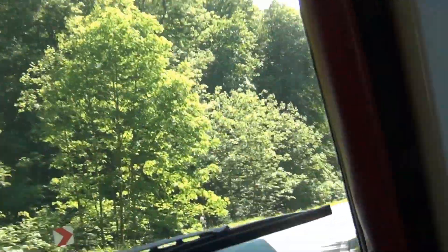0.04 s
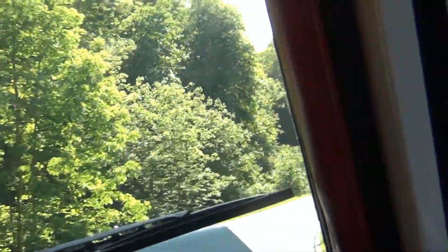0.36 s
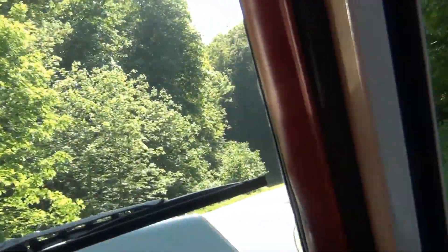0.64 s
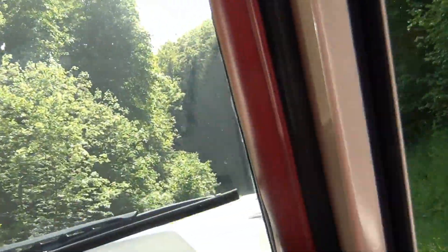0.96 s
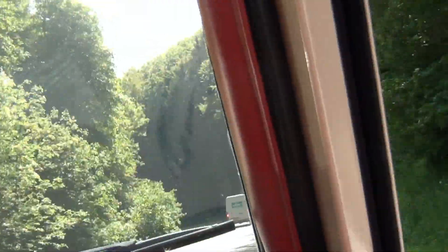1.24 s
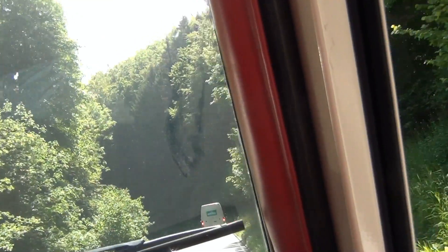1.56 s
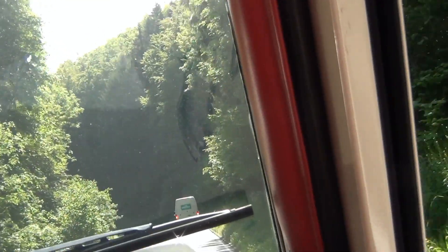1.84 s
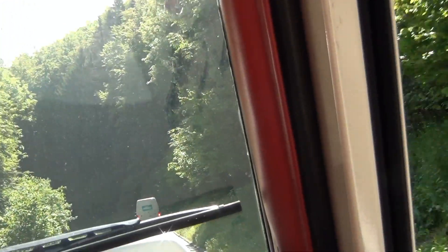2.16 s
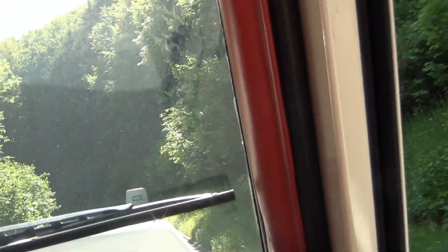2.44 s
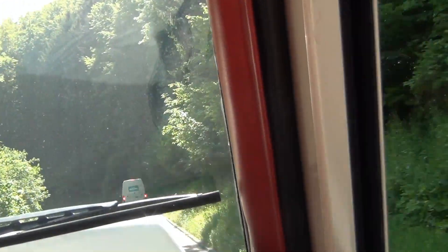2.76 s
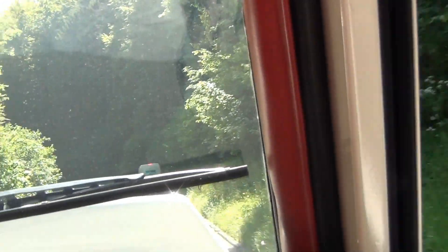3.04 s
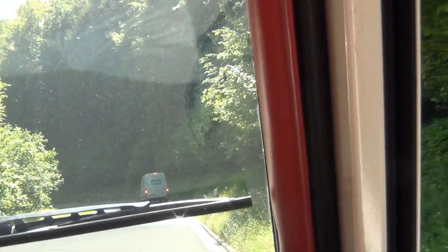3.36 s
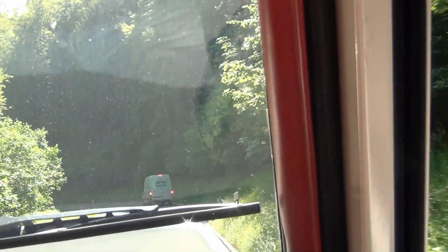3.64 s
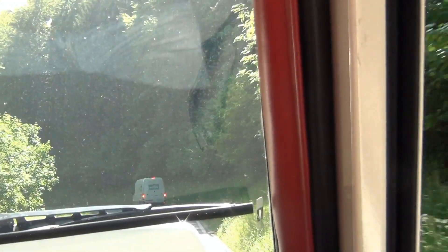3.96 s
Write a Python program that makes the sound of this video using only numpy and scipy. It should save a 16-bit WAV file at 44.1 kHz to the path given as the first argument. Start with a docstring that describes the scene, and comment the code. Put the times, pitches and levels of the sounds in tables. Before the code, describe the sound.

An old van drives along a country road, heard from the front seat. A bump rattles the body, then the engine booms under load over tyre roar and wind hiss, before easing off as loose fittings tick.

```python
"""Inside an old van on a country road: tyres rumble and roar, wind hisses, the driveline hums.
At the start a bump jolts and rattles the body. After a second the engine takes up load with a brief
judder, then booms in the cab as it slowly gains speed, its exhaust overtones sliding through cab
resonances. Near three seconds it eases off and two smaller bumps follow.
Loose fittings tick now and then."""
import sys
import numpy as np
from scipy import signal
from scipy.fft import rfft, irfft
from scipy.io import wavfile
from scipy.ndimage import uniform_filter1d

SR = 44100
rng = np.random.default_rng(int(sys.argv[2]) if len(sys.argv) > 2 else 0)


def transcribe(signal):
    """Save signal, clipped to [-1, 1], as a 16-bit WAV file at the path in sys.argv[1]."""
    frames = np.atleast_2d(signal).T
    limited = np.clip(frames, -1, 1)
    pcm = np.round(limited * 32767).astype(np.int16)
    wavfile.write(sys.argv[1], SR, pcm)


N = 176400
TIME_S = np.arange(N) / SR


def amp(db):
    """Decibels to gain."""
    return 10 ** (np.asarray(db) / 20)


def curve(table, column=1):
    """One table column, interpolated linearly in time."""
    rows = np.array(table, float)
    return np.interp(TIME_S, rows[:, 0], rows[:, column])


def shaped(x, gain):
    """Filters x by gain(Hz); rms 1."""
    y = irfft(rfft(x) * gain(np.fft.rfftfreq(N, 1 / SR) + 1e-3), N)
    return y / np.sqrt(np.mean(y ** 2) + 1e-20)


def coloured(x, spectrum):
    """Filters x through (Hz, dB) points; rms 1."""
    hz, db = np.transpose(spectrum)
    return shaped(x, lambda f: amp(np.interp(np.log(f), np.log(hz), db, right=-100)))


def white():
    """White noise."""
    return rng.standard_normal(N)


def drift(rate_hz):
    """Slow random motion; rms 1."""
    return shaped(white(), lambda f: 1 / (1 + (f / rate_hz) ** 4))


def tone(phase, waver, waver_hz):
    """Sinusoid wavering in level and phase; rms near 1."""
    phase = phase + rng.uniform(0, 2 * np.pi)
    in_phase = (1 + waver * drift(waver_hz)) * np.cos(phase)
    quadrature = waver * drift(waver_hz) * np.sin(phase)
    return np.sqrt(2) * (in_phase + quadrature)


def resonance(hz, centre_hz, width_hz):
    """Gain of one resonance, 1 at its centre."""
    return 1 / np.sqrt(1 + (2 * (hz - centre_hz) / width_hz) ** 2)


def burst(start_s, rise_s, decay_s):
    """Envelope: linear rise, exponential fall."""
    t = TIME_S - start_s
    return np.clip(t / rise_s, 0, 1) * np.exp(-np.maximum(t - rise_s, 0) / decay_s)


# Each row: time in seconds, relative road roar level in dB, relative wind hiss level in dB.
ROAR_WIND_DB = [(0, -27, -40.5), (.2, -28, -38), (.42, -26, -39), (.57, -28, -38), (.7, -26.5, -39.5),
                (.8, -28.5, -40.5), (.92, -26, -37), (1.05, -27.5, -40), (1.2, -29.5, -39.5),
                (1.45, -27, -38.5), (1.65, -29.5, -41), (2.0, -32.5, -42), (2.35, -32, -41),
                (2.5, -32, -41.5), (2.97, -30.5, -41), (3.22, -28, -40), (3.32, -26, -40.5),
                (3.5, -27.5, -40), (3.72, -29, -38), (3.92, -27, -37), (4, -28, -39)]
# Each row: frequency in Hz, relative spectral density in dB.
ROAR_SPECTRUM = [(200, -33.5), (500, 5), (800, 2.5), (1100, 1), (1400, -3), (1950, -3.5), (2500, -11.5),
                 (3500, -17), (7000, -37.5)]
WIND_SPECTRUM = [(1000, -19), (2500, 3), (3500, 0), (5000, -1.5), (6500, -6), (8800, -11), (10500, -18),
                 (13000, -24.5), (16000, -28.5)]

def roar_and_wind(firing_phase):
    """Road roar throbs with the engine, wind hisses at the window; both flutter together."""
    throb = 1 + 0.055 * np.cos(firing_phase / 2) + 0.13 * np.cos(firing_phase)
    flutter = drift(rate_hz=12)
    roar_db = curve(ROAR_WIND_DB, column=1) + 2.5 + 0.79 * flutter
    wind_db = curve(ROAR_WIND_DB, column=2) + 1 + 0.77 * flutter
    roar = coloured(white(), ROAR_SPECTRUM) * throb * amp(roar_db)
    wind = coloured(white(), WIND_SPECTRUM) * amp(wind_db)
    return roar + wind


def trim_rattle(taps_per_s=45, decay_s=0.0045):
    """Faint random chatter of the trim, following the wind hiss in colour and level."""
    hits = rng.random(N) < taps_per_s / SR
    strength_db = 8.3 * np.minimum(rng.exponential(1, N), 3)
    envelope = signal.lfilter([1], [1, -np.exp(-1 / (decay_s * SR))], hits * amp(strength_db))
    chatter = coloured(envelope * white(), WIND_SPECTRUM)
    return chatter * amp(curve(ROAR_WIND_DB, column=2) - 15)


# Each row: start in seconds, level in dB, ring frequency in Hz.
FITTING_TICKS = [(1.232, -35, 7000), (1.516, -29, 3380), (2.782, -47, 10000), (2.817, -40.5, 9450),
                 (3.157, -33, 4600), (3.245, -36, 4200), (3.846, -30.5, 4500)]

def fitting_tick(start_s, level_db, ring_hz):
    """A loose fitting taps and rings briefly."""
    ring = shaped(white(), lambda f: resonance(f, ring_hz, width_hz=0.192 * ring_hz) ** 2)
    return amp(level_db) * burst(start_s, rise_s=0.0014, decay_s=0.0045) * ring


# Each row: time in seconds, relative level in dB.
RUMBLE_LEVEL_DB = [(0, -21.5), (.15, -22.5), (.42, -16), (.9, -21.5), (1.3, -28), (1.5, -20), (1.95, -32),
                   (2.15, -25), (2.7, -27), (2.87, -21.5), (3.15, -21.5), (3.65, -18), (4, -18)]
BODY_LEVEL_DB = [(0, -17), (.4, -15), (.75, -14.5), (1.0, -14.5), (1.15, -17), (1.35, -14.5), (1.7, -21),
                 (2.2, -21.5), (2.6, -23), (2.8, -19.5), (3.1, -18), (3.25, -19), (3.4, -17.5), (3.52, -16),
                 (3.7, -19), (4, -16.5)]
# Each row: frequency in Hz, relative spectral density in dB.
RUMBLE_SPECTRUM = [(10, -26), (24, -9), (40, -0.5), (65, -0.5), (100, -2.5), (140, 2.5), (200, -8),
                   (400, -42.5)]
BODY_SPECTRUM = [(90, -35), (160, -1.5), (200, -5), (230, 4), (270, -1), (320, -1), (390, -5.5), (460, -7),
                 (540, -10.5), (700, -19), (1100, -32), (3000, -66.5)]

def body_rumble():
    """The wheels shake the floor; the body drones and one panel hums."""
    body_db = curve(BODY_LEVEL_DB)
    rumble = coloured(white(), RUMBLE_SPECTRUM) * amp(curve(RUMBLE_LEVEL_DB) + 0.5)
    drone = coloured(white(), BODY_SPECTRUM) * amp(body_db - 2)
    panel = shaped(white(), lambda f: resonance(f, centre_hz=447.8, width_hz=29) ** 2)
    return rumble + drone + panel * amp(body_db - 12)


# Each row: start in seconds, level in dB, rise and decay in seconds, low and high corner in Hz.
BUMP_JOLTS = [(.023, -6, 0.0099, .012, 185.2, 452), (.026, -16, 0.019, 0.016, 600, 1400),
              (.027, -28.5, .008, 0.025, 2500, 9000), (0.041, -8, 0.025, 0.019, 40, 110),
              (0.061, -11, 0.016, 0.0047, 940, 1570), (0.059, -20.5, 0.013, 0.02, 2200, 7600),
              (.07, -26, 0.011, 0.057, 2980, 9900), (3.19, -27, 0.05, 0.015, 720, 950),
              (3.484, -17.5, 0.018, 0.023, 280.5, 397)]

def bump_jolt(start_s, level_db, rise_s, decay_s, low_hz, high_hz):
    """A bump makes body panels thud or clatter: a burst of band-passed noise."""
    def band(f):
        return 1 / np.sqrt((1 + (low_hz / f) ** 4) * (1 + (f / high_hz) ** 4.6) * (1 + (f / 10000) ** 6))
    return amp(level_db) * burst(start_s, rise_s, decay_s) * shaped(white(), band)


# Each row: multiple of the firing rate, relative level in dB.
DRIVELINE_ORDERS = [(1.65, 0), (3.3, -6.5)]
# Each row: time in seconds, relative level in dB.
DRIVELINE_LEVEL_DB = [(0, -24), (1.0, -27.5), (1.7, -25), (2.05, -31), (2.5, -23.5), (2.85, -30),
                      (3.25, -22), (3.55, -23.5), (4, -26.5)]

def driveline_hum(firing_phase):
    """The driveline hums unsteadily, tracking engine speed."""
    hum = sum(amp(db) * tone(order * firing_phase, waver=0.36, waver_hz=7.4)
              for order, db in DRIVELINE_ORDERS)
    return amp(curve(DRIVELINE_LEVEL_DB)) * hum


# Each row: multiple of the firing rate, relative level in dB.
BLOCK_ORDERS = [(1.5, -25), (2, -34.5)]

def engine_block(firing_phase):
    """Unsteady block tones swell with the shaking of the body."""
    tones = sum(amp(db) * tone(order * firing_phase, waver=0.46, waver_hz=6.1)
                for order, db in BLOCK_ORDERS)
    body_db = curve(BODY_LEVEL_DB)
    return amp(body_db - body_db.max()) * tones


# Each row: multiple of the firing rate, relative level on resonance in dB,
# centre and width of the nearest cab resonance in Hz.
EXHAUST_ORDERS = [(.5, -24, 69.5, 3), (2, -22.5, 296, 18), (3, -31, 450, 8), (4, -26, 584, 37),
                  (5, -29, 726, 32), (6, -33.5, 864, 14), (7, -40.5, 1044, 52), (9, -47, 1305, 28)]
# Each row: time in seconds, exhaust gain with load in dB.
LOAD_GAIN_DB = [(0, -22), (.82, -17.5), (.98, 2.5), (1.5, 1), (1.8, 0.5), (2.6, -1), (2.85, -1.5),
                (3.0, -17.5), (4, -20)]

def exhaust(firing_hz, firing_phase):
    """Exhaust overtones swell under load and slide through cab resonances."""
    overtones = np.zeros(N)
    for order, db, centre_hz, width_hz in EXHAUST_ORDERS:
        cab_gain = resonance(order * firing_hz, centre_hz, width_hz)
        overtones += amp(db) * cab_gain * tone(order * firing_phase, waver=0.074, waver_hz=11)
    return amp(curve(LOAD_GAIN_DB)) * overtones


# Each row: time in seconds, level in dB before the judder dips.
BOOM_LEVEL_DB = [(0, -21), (.13, -18.5), (.5, -15.5), (.72, -15), (.88, -21), (1.0, -8), (1.4, -8),
                 (2.0, -9.4), (2.8, -9.8), (3.11, -22.5), (3.33, -12), (3.6, -14.5), (3.7, -17.5), (4, -13)]

def cab_boom(firing_phase):
    """The cab booms at the firing rate."""
    return amp(curve(BOOM_LEVEL_DB)) * tone(firing_phase, waver=0.0097, waver_hz=16)


def judder(start_s, rate_hz, decay_s):
    """Dying swing of the drivetrain as it takes up load."""
    t = np.maximum(TIME_S - start_s, 0)
    return np.sin(2 * np.pi * rate_hz * t) * np.exp(-t / decay_s)


# Each row: time in seconds, firing rate in Hz before the judder.
FIRING_RATE_HZ = [(0, 140), (.35, 138), (.88, 136.9), (1.02, 143.5), (1.5, 142.5), (1.75, 145),
                  (2.2, 146.9), (2.65, 149.6), (2.95, 148.5), (3.4, 149.6), (4, 149.6)]

def scene():
    """Everything heard from the front seat; mono."""
    swing = judder(start_s=0.98, rate_hz=5.41, decay_s=0.29)
    firing_hz = curve(FIRING_RATE_HZ) + 6.73 * swing
    firing_phase = 2 * np.pi * np.cumsum(firing_hz) / SR
    dip_db = 16 * np.minimum(swing, 0)  # the note dips in each trough
    bumps = sum(bump_jolt(*row) for row in BUMP_JOLTS)
    ticks = sum(fitting_tick(*row) for row in FITTING_TICKS)
    note = amp(dip_db) * (cab_boom(firing_phase) + exhaust(firing_hz, firing_phase))
    machinery = engine_block(firing_phase) + driveline_hum(firing_phase)
    background = roar_and_wind(firing_phase) + body_rumble() + trim_rattle()
    return (background + ticks + bumps + machinery + note)[None]


def record(dry, limit_db=-1.5, recovery_db_per_s=24.5, cutoff_hz=15750):
    """Peak limiter with slow recovery, then clip and low-pass."""
    over_db = np.maximum(20 * np.log10(abs(dry[0]) + 1e-9) - limit_db, 0)
    recovery_db = TIME_S * recovery_db_per_s
    held_db = np.maximum.accumulate(over_db + recovery_db) - recovery_db
    duck_db = uniform_filter1d(held_db, size=200)
    limited = np.clip(dry * amp(-duck_db), -1, 1)
    low_pass = signal.firwin(511, cutoff_hz, window=("kaiser", 9), fs=SR)
    return signal.oaconvolve(limited, low_pass[None], "same")


dry = scene()
out = record(dry)
transcribe(out)
```